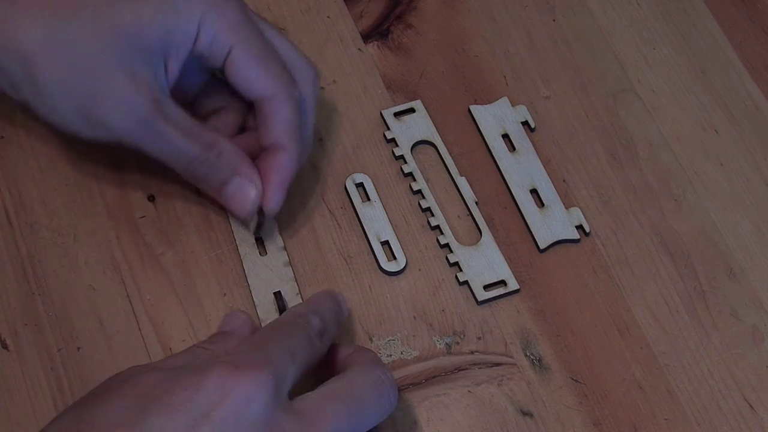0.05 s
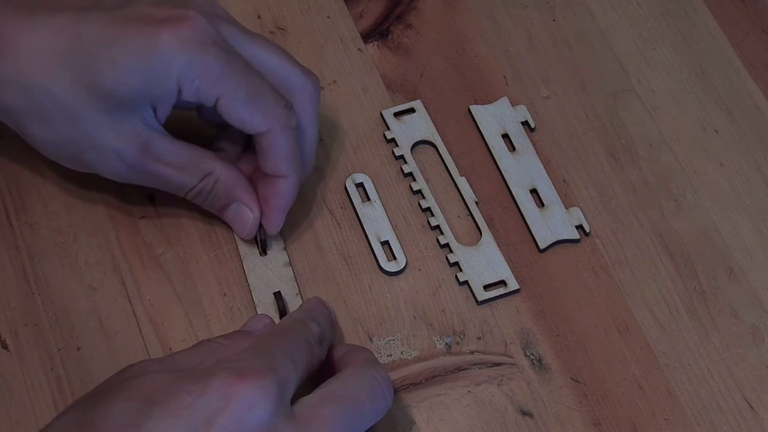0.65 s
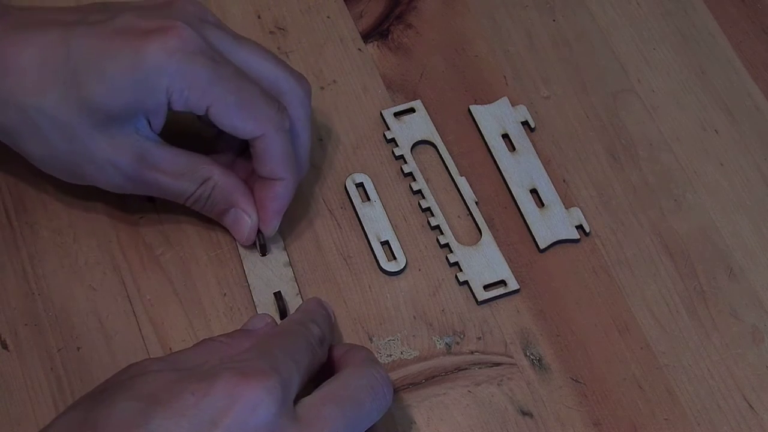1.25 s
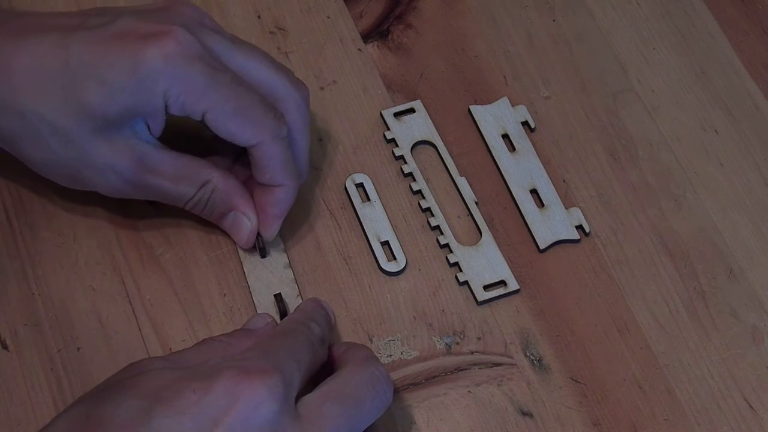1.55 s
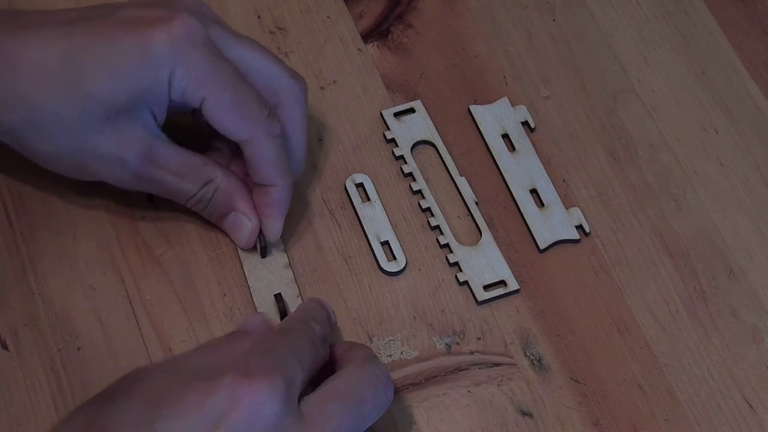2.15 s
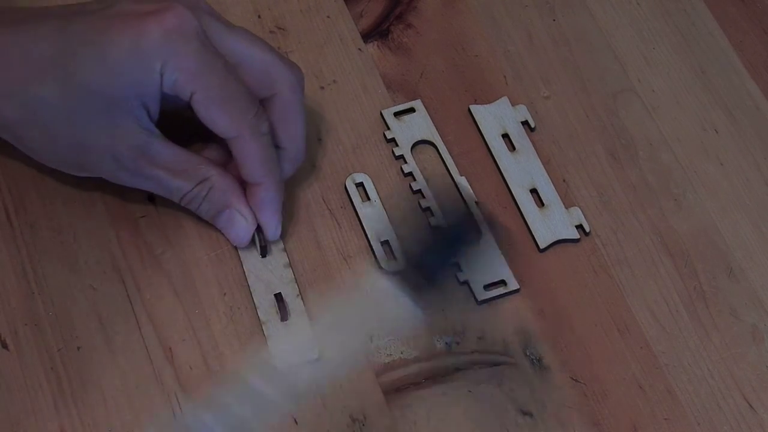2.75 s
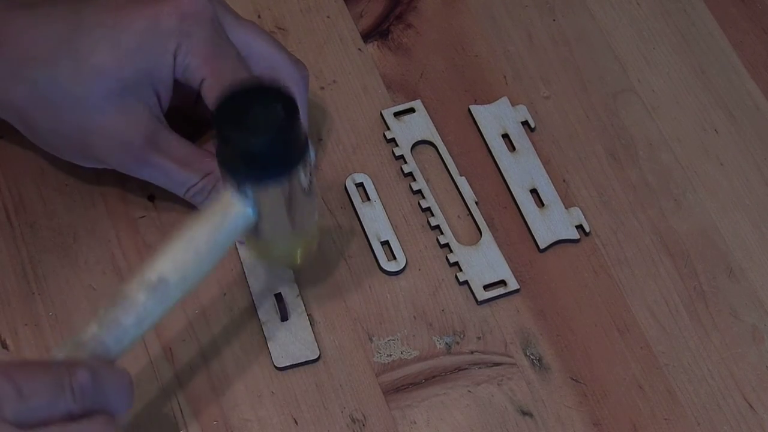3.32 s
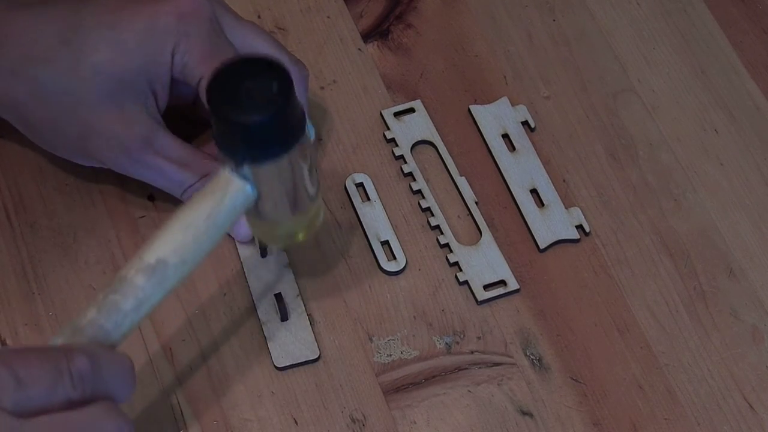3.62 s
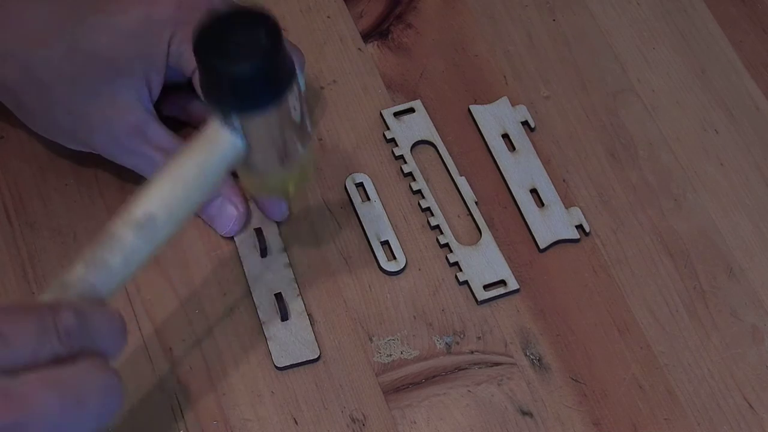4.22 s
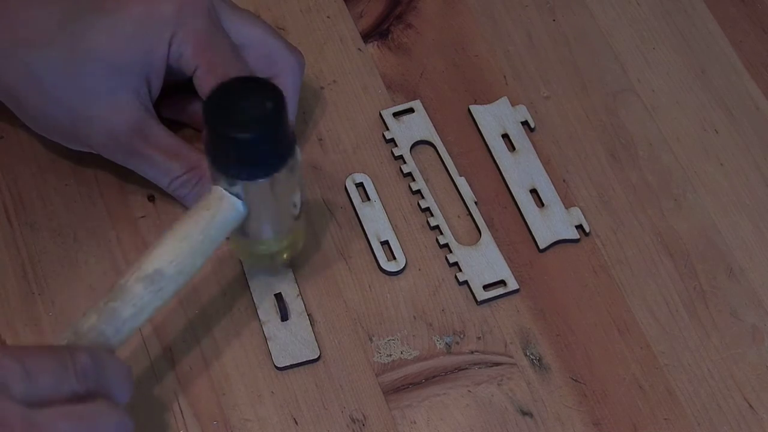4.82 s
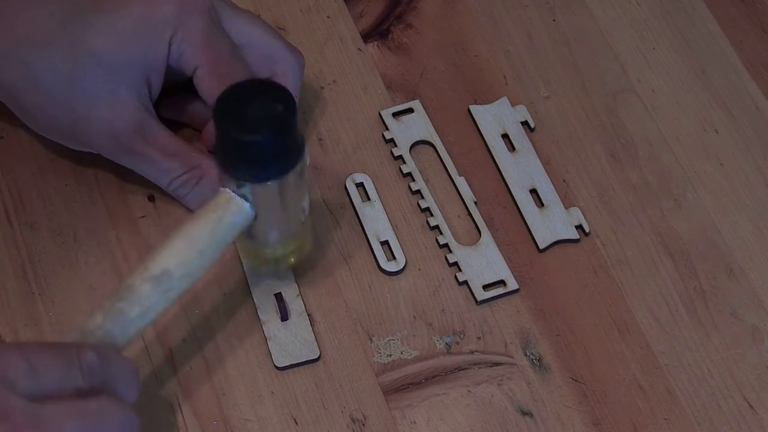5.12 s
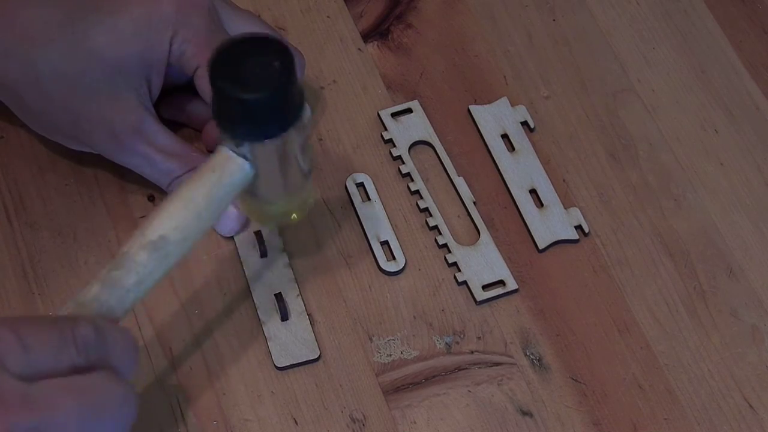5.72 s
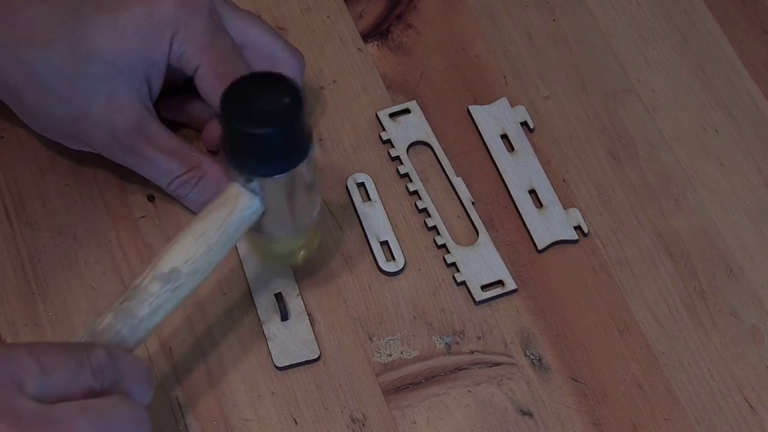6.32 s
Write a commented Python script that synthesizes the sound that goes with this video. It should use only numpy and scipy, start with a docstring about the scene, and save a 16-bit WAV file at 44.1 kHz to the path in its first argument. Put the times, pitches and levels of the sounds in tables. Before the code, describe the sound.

In a bare workroom with a quiet fan-like hum and hiss and a few faint distant chirps, fingers rub briefly on wood and a small mallet bumps on the bench as it is picked up. Twelve taps follow, gradually quickening, driving a wooden peg into a tight slot. Each is a woody knock with a tiny rasp and a short room ring. The last is dull. It is heard in stereo from near the bench.

```python
"""A bare, boxy workroom has a quiet fan-like hum and hiss, with faint high chirps in the distance.
Fingers rub on wood, a forearm slides off the workbench, and a small mallet bumps as it is picked up.
Twelve taps then drive a plywood peg into its slot: each thumps the bench, rings the wood and makes the
tight joint rasp. The room rings on after each tap, and the hum and hiss grow quieter.
The last tap is dull: the peg is home."""
import sys
import numpy as np
from scipy import signal
from scipy.fft import rfft, irfft
from scipy.io import wavfile
from scipy.ndimage import uniform_filter1d

SR = 44100
rng = np.random.default_rng(int(sys.argv[2]) if len(sys.argv) > 2 else 0)


def wav_out(sig):
    """Save sig, one row per channel (or a flat mono array), as 16-bit PCM at SR to the path in sys.argv[1]."""
    wavfile.write(sys.argv[1], SR, np.round(np.clip(np.atleast_2d(sig).T, -1, 1) * 32767).astype(np.int16))


N = 284886
T = np.arange(N) / SR
HIT_T, TAIL_T = T[:SR // 4], T[:32768]  # time in seconds within one hit, and within the room's ring

# mallet taps: t/s, strength/dB, slip of the peg (0 to 1), hardness of the contact/dB
TAPS = [(3.2528, 2.5, 0.2, -3.5), (3.5141, -1.5, 0.47, 3), (4.0886, 0, 0.67, -6), (4.483, 2.5, 0.61, -3.5),
        (4.8315, 0.2, .93, -2), (5.114, -0.5, 0.86, -0.5), (5.3577, -2, 0.94, 3), (5.5931, -1, 0.44, 5.5),
        (5.8255, 2, 0.34, 2.5), (6.0243, 3, 0.17, -1.5), (6.2195, 4, 0.21, -0.5), (6.3876, -1, 0.08, -10.5)]
# deep tones of the bench frame: f/Hz, relative level/dB, fade time/s
BENCH_TONES = [(82.6, -4, 0.057), (138.4, 3, 0.031), (278, 1, 0.025)]
# the room's wash of echoes: f/Hz, gain/dB, fade time/s, stereo width/dB
ROOM_WASH = [(76, -7, 0.22, -16), (270, 3, 0.37, -14.5), (524, 2.5, 0.37, -10.5), (1040, 4, 0.53, -6.5),
             (1920, 5, 0.66, -2), (3800, 5, 0.5, 0), (6550, -0.5, 0.5, 0.5), (11100, -2, 0.34, 0),
             (15800, -3, 0.17, 1)]


def amp(db):
    """Turn decibels into a factor to multiply by."""
    return 10 ** (np.asarray(db) / 20)


def fade(t, t60):
    """Die away by 60 dB in t60 seconds, the fade time."""
    return np.exp(-np.log(1000) * t / t60)


def unit(x):
    """Scale a hit to the energy of 10 ms at full level."""
    return x / np.sqrt(np.mean(np.sum(x ** 2, axis=-1)) / (SR / 100))


def add(out, start_s, x):
    """Mix x into out, beginning at start_s."""
    i = max(int(start_s * SR), 0)
    out[:, i:i + x.shape[-1]] += x[..., :N - i]


def look_up(hz, table, column=1):
    """Read a table between its rows, on a scale where all octaves are equally wide."""
    table = np.array(table)
    return np.interp(np.log(hz + 1), np.log(table[:, 0]), table[:, column])


def noise(size, shape, side_db):
    """Stereo noise of strength 1, coloured by shape(Hz); a higher side_db sounds wider."""
    hz = np.fft.rfftfreq(size, 1 / SR) + 1
    mid, side = irfft(rfft(rng.standard_normal((2, size))) * shape(hz), size)
    x = mid + amp(side_db) * side * np.array([[1], [-1]])
    return x / x.std()


def band(size, hz, width, side_db):
    """Noise in a steep-sided band around hz, width Hz wide."""
    return noise(size, lambda f: 1 / np.sqrt(1 + ((f * f - hz * hz) / (f * width)) ** 6), side_db)


def hum_and_hiss():
    """A low rush, wavering hum tones and a wide, smooth hiss; all grow quieter once the taps begin."""
    # colour of the rush and hiss: f/Hz, relative level/dB
    colour = [(18, -62), (30, -59), (86, -7), (118, -31), (149, -5), (280, -17), (328, -5.5), (394, -4),
              (499, -4), (988, -10.5), (1630, -24.5), (2010, -26), (3670, -28), (14800, -27.5),
              (16000, -29)]
    # hum tones: f/Hz, relative level/dB
    hum_tones = [(145.3, -61), (193.8, -65), (393.0, -60), (839.8, -61.5), (979.8, -62), (2056, -72.5),
                 (2638, -76), (3618, -76)]
    rush = noise(N, lambda f: amp(look_up(f, colour)), side_db=0)
    side_gain = amp(look_up(np.fft.rfftfreq(N, 1 / SR), ROOM_WASH, column=3))
    side = irfft(rfft(rush[0]) * side_gain, N)
    out = amp(-51) * (rush[1] + side * np.array([[1], [-1]]))
    for hz, db in hum_tones:
        out += amp(db - 2.5) * band(N, hz, width=22, side_db=-10)
    low = signal.sosfiltfilt(signal.butter(2, 4500, fs=SR, output="sos"), out)
    hiss = out - low
    # with each tap the level sinks by a share of the way left to its full drop
    share, sink_s, low_drop_db, hiss_drop_db = 0.61, 0.08, -8.5, -14
    taps_so_far = np.searchsorted([tap[0] + sink_s / 2 for tap in TAPS], T)
    sunk = uniform_filter1d(1 - (1 - share) ** taps_so_far, size=int(sink_s * SR))
    return low * amp(low_drop_db * sunk) + hiss * amp(hiss_drop_db * sunk)


def chirps():
    """Soft, blurred whistles far in the background."""
    # whistles: t/s, level/dB, f/Hz
    whistles = [(0.041, -62, 3760), (0.185, -64.5, 3930), (0.662, -60.5, 3700), (2.46, -57, 4260),
                (2.56, -53.5, 4000), (2.745, -57.5, 3700), (3.775, -67, 3740)]
    out, size = np.zeros((2, N)), int(0.11 * SR)
    for s, db, hz in whistles:
        whistle = band(SR // 4, hz, width=650, side_db=-2)[:, :size]
        add(out, s, amp(db) * np.hanning(size) * whistle)
    return out


def slide(bands, rise, t60):
    """One surface slides over another: grainy noise that swells for rise seconds, then fades."""
    t, grain_samples = T[:SR // 2], 144
    grain = uniform_filter1d(rng.standard_normal(len(t)), grain_samples) * np.sqrt(grain_samples)
    swell = np.minimum(t / rise, 1) * fade(np.maximum(t - rise, 0), t60)
    friction = sum(amp(db) * band(len(t), hz, width, look_up(hz, ROOM_WASH, column=3))
                   for hz, width, db in bands)
    return amp(3 * grain) * swell * friction


def rubs():
    """Skin and plywood rub briefly on wood; the forearm slides off the bench with a low rumble."""
    # rubbing strokes: t/s, level/dB, rise time/s, fade time/s
    strokes = [(1.796, -43.5, 0.023, 0.05), (2.21, -55.5, .004, .05), (2.241, -53, .001, .042),
               (2.456, -55, 0.0054, 0.59), (2.786, -60, 0.0025, 0.098)]
    # noise bands of a rub: f/Hz, width/Hz, relative level/dB
    rub_bands = [(680, 730, -0.5), (1555, 430, -1), (3430, 4100, 0)]
    out = np.zeros((2, N))
    for s, db, rise, t60 in strokes:
        add(out, s, amp(db) * slide(rub_bands, rise, t60))
    arm_s, arm_hz, arm_width_hz, arm_db = 2.054, 83, 31, -51
    add(out, arm_s, slide([(arm_hz, arm_width_hz, arm_db)], rise=0.014, t60=1.3))
    return out


def ring(tones):
    """A struck object rings with its own tones; each builds up over its first cycle, then fades."""
    out = 0
    for hz, db, t60 in tones:
        build_up = 1 - np.exp(-3 * hz * HIT_T)
        out += amp(db) * unit(np.sin(2 * np.pi * hz * HIT_T) * build_up * fade(HIT_T, t60))
    return unit(out)


def crackle(hz, width, rise, t60, side_db):
    """Wood fibres crackle: noise that swells within a millisecond or so and dies fast."""
    swell = 1 - np.exp(-HIT_T / rise)
    return unit(band(len(HIT_T), hz, width, side_db) * swell * fade(HIT_T, t60))


def mallet_bumps():
    """As it is picked up, the mallet knocks on the bench and bounces twice, ever sooner and weaker."""
    # knocks: t/s, level/dB, favoured f/Hz (lower for a softer contact), change per bounce/dB
    knocks = [(2.4543, -29, 350, -21), (2.531, -35, 520, -18), (2.6178, -21.5, 612, -4)]
    # tones of the mallet: f/Hz, relative level/dB, fade time/s
    mallet_tones = [(359.3, 11, 0.33), (427, 14.5, 0.074), (524, 5.5, 0.077), (684, 10, 0.06),
                    (790, 9, 0.031), (847, 5, 0.091), (1020, -13, 0.019), (990, 3, 0.053),
                    (1345, 2.5, 0.022), (1850, 3, 0.011)]
    first_gap_s, gap_shrink, bounce_brightening = 0.0183, 0.63, 1.39
    out, frame = np.zeros((2, N)), amp(-19.5) * ring(BENCH_TONES)
    for s, db, first_hz, bounce_db in knocks:
        tick = crackle(1530, 4400, rise=0.00038, t60=0.028, side_db=-4)
        add(out, s, amp(db - 18.5) * tick)
        for bounce in range(3):
            favoured_hz = first_hz * (bounce_brightening if bounce else 1)
            # tones lose 11 dB for each octave away from the favoured pitch
            tones = [(hz, tone_db - 11 * abs(np.log2(hz / favoured_hz)), t60)
                     for hz, tone_db, t60 in mallet_tones]
            add(out, s, -amp(db + bounce * bounce_db) * (ring(tones) + frame))
            s += first_gap_s * gap_shrink ** bounce
    return out


def mallet_taps():
    """The mallet meets the peg, the peg slips into its slot, and the bench takes the blow."""
    # tones of the knocked wood: f/Hz, relative level/dB, fade time/s
    wood_tones = [(662, 11, 0.012), (776, 2, 0.013), (895, 4, 0.048), (1109, 4.5, 0.024), (1291, 0, 0.025),
                  (1420, -30, 0.04), (1570, -1.5, 0.0076), (1704, -17, 0.049), (2003, -6, 0.0028)]
    # tones of the peg: f/Hz, relative level/dB, fade time/s
    peg_tones = [(3270, -6, 0.0044), (3770, -5.5, 0.025), (4075, -13, 0.013), (4220, -8.5, 0.0077),
                 (4700, -25, 0.01)]
    wood, peg, frame = ring(wood_tones), ring(peg_tones), ring(BENCH_TONES)
    out = np.zeros((2, N))
    depth, full_travel = 0, sum(tap[2] for tap in TAPS)
    seated_s, thump_hz = 5.5, 522.3
    for s, db, slip, hard_db in TAPS:
        pitch = 0.939 if s > seated_s else 1  # thump and rasp drop once the peg reaches the bench
        # the bench top takes a cycle or two to get moving; a slipping peg softens its thump
        bench_top = unit(ring([(thump_hz * pitch, 0, 0.019)]) * (1 - np.exp(-HIT_T / 0.0027)))
        thump = amp(-22 - 17.5 * slip) * bench_top
        knock = amp(-30.5 + 4 * slip) * wood
        add(out, s + 0.0006, -amp(db) * (thump + knock + amp(-40.5) * frame))
        # a hard contact ticks and rings the peg, which rings less the deeper it sits
        splinter = crackle(3950, 1070, rise=0.00019, t60=0.014, side_db=-5)
        snap = amp(-37 - 5.5 * depth) * (amp(-0.5) * peg + splinter)
        tick = amp(-44 + 8.5 * slip) * crackle(10600, 5600, rise=0.000093, t60=0.009, side_db=-1)
        add(out, s + 0.0004, amp(db + hard_db) * (snap + tick))
        add_joint_rasp(out, s, db, slip, pitch)
        depth += slip / full_travel
    return out


def add_joint_rasp(out, s, db, slip, pitch):
    """The tight joint cracks and crushes fibres as the peg slips in two jerks; more slip is louder."""
    gain = amp(db - 30) * slip ** 0.77
    crack = amp(-1) * crackle(1490, 850, rise=0.00015, t60=0.012, side_db=-8.5)
    fibres = amp(-3.5) * crackle(5200, 5500, rise=0.00021, t60=0.018, side_db=-4)
    add(out, s + 0.00016, gain * (crack + fibres))
    jerk_hz = pitch * (7130 - 2150 * slip ** 5)  # only the longest slips pull the pitch down
    for delay_s in (0.0005, 0.0018):
        jerk = amp(-2.5) * crackle(jerk_hz, 2300, rise=0.0001, t60=0.0092, side_db=3.5)
        add(out, s + delay_s, gain * jerk)


def echo_wash(edges_hz):
    """Countless late echoes blend; each band between two edges has its own fade time and stereo width."""
    out, build_up = 0, np.clip(TAIL_T / 0.0079, 0, 1) ** 2
    for lo, hi in zip(edges_hz, edges_hz[1:]):
        db, t60, side_db = (look_up(np.sqrt(lo * hi), ROOM_WASH, column) for column in (1, 2, 3))
        tail = noise(len(TAIL_T), lambda f: (f >= lo) & (f < hi), side_db) * fade(TAIL_T, t60) * build_up
        energy = np.mean(np.sum(tail ** 2, axis=1))
        out += amp(db) * tail * np.sqrt(2 * (hi - lo) / SR / energy)
    return out


def room(dry):
    """Near surfaces answer first; then the room's own tones and a wash of echoes ring on."""
    # first echoes: delay/s, gain/dB
    first_echoes = [(.006, -3.5), (.0076, -9)]
    # tones of waves trapped between the walls: f/Hz, gain/dB, fade time/s
    room_tones = [(130, 11.5, 0.61), (177.4, 18.5, 0.56), (212.4, 5.5, 0.59), (290, -2, 1),
                  (354.7, 5.5, 0.93), (392.7, -1.5, 0.95), (449, 8.5, 0.3), (469, 8, 0.15), (498.5, -1, 1),
                  (557.5, 12.5, 0.2), (617, 14, 0.28), (652, 0.5, 1), (820, -3.5, 0.54), (1063, -11, 0.66),
                  (1240, 16.5, 0.65)]
    low_edges_hz, high_edges_hz = np.geomspace(60, 2000, 12), np.geomspace(2000, 17000, 11)
    response = echo_wash(low_edges_hz)
    response[:, 0] += 1  # the sound that arrives directly
    for hz, db, t60 in room_tones:
        gain = amp(db) * 2 * np.log(1000) / (t60 * SR)
        response += gain * np.cos(2 * np.pi * hz * TAIL_T) * fade(TAIL_T, t60)
    blur_s = 0.000035  # rough surfaces blur the echo and return little treble
    for delay_s, db in first_echoes:
        blur = np.exp(-0.5 * ((TAIL_T - delay_s) / blur_s) ** 2)
        response += amp(db) * blur / blur.sum()
    out = signal.fftconvolve(dry, response, axes=1)[:, :N]
    # hand and mallet move between taps, so the treble scatters anew each time
    cuts = [0] + [int((tap[0] - 0.01) * SR) for tap in TAPS] + [N]
    for start, end in zip(cuts, cuts[1:]):
        add(out, start / SR, signal.fftconvolve(dry[:, start:end], echo_wash(high_edges_hz), axes=1))
    return out


def scene():
    """Chirps, rubs, bumps and taps sound through the room, over the hum and hiss."""
    return hum_and_hiss() + room(chirps() + rubs() + mallet_bumps() + mallet_taps())


def record(dry):
    """The microphone loses the deep bass and the very top."""
    bass_cut = signal.butter(7, 58, "high", fs=SR, output="sos")
    top_cut = signal.ellip(10, 0.2, 80, 16000, fs=SR, output="sos")
    return signal.sosfilt(top_cut, signal.sosfilt(bass_cut, dry))


dry = scene()
out = record(dry)
wav_out(out)
```